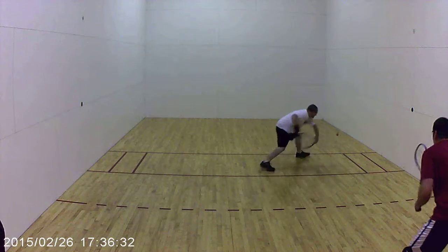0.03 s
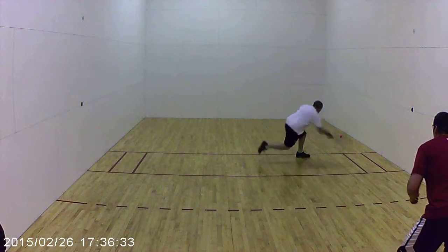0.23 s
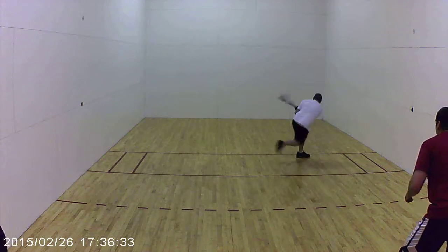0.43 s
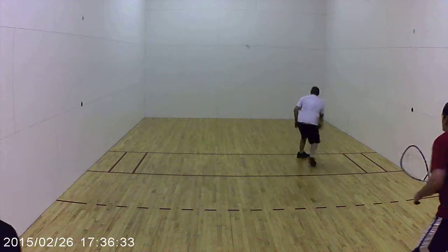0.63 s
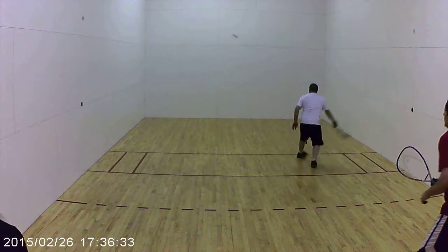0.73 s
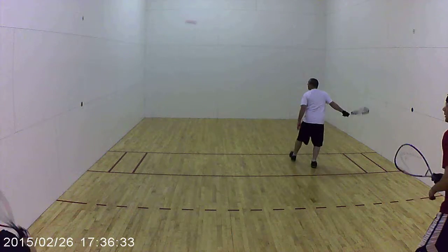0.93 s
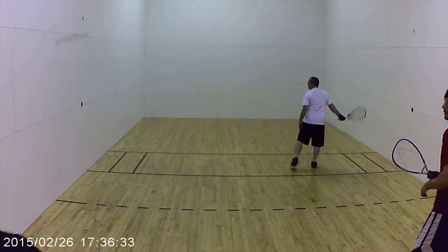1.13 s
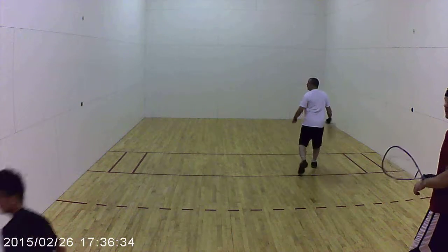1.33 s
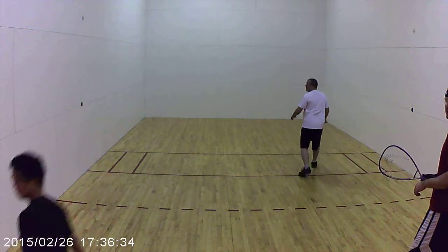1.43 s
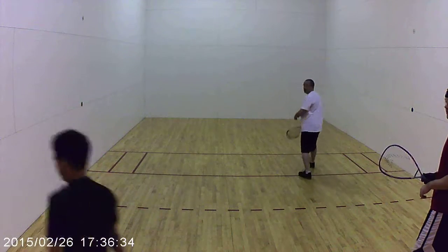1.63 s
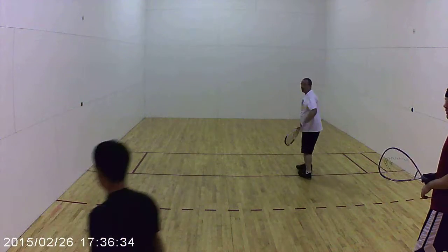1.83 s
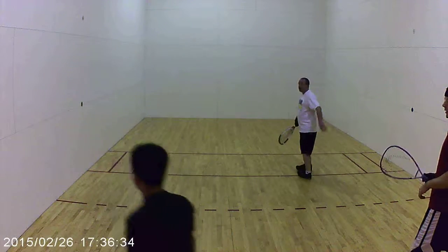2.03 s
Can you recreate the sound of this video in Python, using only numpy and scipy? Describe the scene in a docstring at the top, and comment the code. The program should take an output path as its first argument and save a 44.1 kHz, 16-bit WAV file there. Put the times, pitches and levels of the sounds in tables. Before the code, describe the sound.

Ball struck by racket slams the front wall of an indoor court, echo ringing long afterward.

```python
"""Ball blows in a hard-walled court

A racket strikes a hollow rubber ball, which slams into the front wall and later bounces on the wooden floor;
players' feet thud. Each blow is a short filtered click, heard straight and through seconds of decaying noise
that stands for the dense reflections. A dull frame knock, rumble and hiss are added; a small recorder overloads.
"""
import sys
import numpy as np
from scipy import signal
from scipy.fft import rfft, irfft
from scipy.io import wavfile

SR = 44100
rng = np.random.default_rng(int(sys.argv[2]) if len(sys.argv) > 2 else 0)


def natural_amplitude(level_db):
    """Convert a level in decibels to a linear amplitude factor, elementwise."""
    exponent = np.asarray(level_db, float) / 20
    return 10 ** exponent


def wav_record(signal):
    """Record a signal, one row per channel, as 16-bit PCM in the file named by sys.argv[1]."""
    frames = np.transpose(np.atleast_2d(signal))
    bounded = np.clip(frames, -1, 1)
    # unit amplitude maps onto the largest positive 16-bit level
    quanta = np.round(bounded * 32767).astype(np.int16)
    wavfile.write(sys.argv[1], SR, quanta)


N = 92610  # samples, 2.1 s

# racket blow: (time [s], echo level [dB], direct energy re 10 ms of echo [dB], build-up constant [s])
RACKET_HIT = (.2268, -13, -24, .016)
# relative spectrum of a ball on the front wall: (frequency [Hz], density [dB per Hz])
WALL = [(24, -35), (45, -18), (97, -11), (160, -13), (215, -11), (294, -1), (480, -7), (816, 0), (974, -6),
        (1450, -17), (1660, -12), (1940, -27), (2530, -27), (4000, -41), (8000, -56), (10400, -90)]


def read(points, hz):
    """Interpolation on a logarithmic frequency axis."""
    f, value = np.transpose(points)
    return np.interp(np.log(hz + 1), np.log(f + 1), value)


def add(mix, s, sound):
    """Superposition: adds a sound from time s, cropped to the mix."""
    at = round(s * SR)
    part, sound = mix[max(at, 0):], sound[max(-at, 0):]
    part[:len(sound)] += sound[:len(part)]


def pulse(points, size=8192):
    """Minimum phase: the most compact causal click with this relative spectrum, of energy 1."""
    hz = abs(np.fft.fftfreq(size, 1 / SR))
    log_gain = np.log(natural_amplitude(np.maximum(read(points, hz), -100)))
    # the Hilbert transform of the log gain gives the phase
    spectrum = np.exp(np.conj(signal.hilbert(log_gain)))
    click = np.fft.ifft(spectrum).real[:size // 2]
    return click / np.linalg.norm(click)


def mirrors():
    """Image sources: the straight path and the nearest wall paths, of alternating sign."""
    # straight path, then nearest mirror paths: (delay [s], level [dB])
    near_walls = [(0, 0), (.0065, -1), (.0115, -2)]
    out = np.zeros(1024)
    for k, (s, db) in enumerate(near_walls):
        out[round(s * SR)] = (-1) ** k * natural_amplitude(db)
    return out


def court(rise_s, t60_share, swells=(), size=2 * N):
    """Diffuse reverberation: noise builds up, decays exponentially in each band and may swell by chance."""
    # decay time of the court at a share of 1: (frequency [Hz], T60 [s])
    decay_times = [(40, 1.2), (150, 1.1), (300, 3.5), (500, 5), (800, 5.4), (1200, 4.4), (1700, 3.9),
                   (2500, 3.2), (4000, 2.2), (8000, 1.4)]
    swell_s = .011
    early_db, early_s = 2., .1  # the first reflections stand above the even wash
    taps = rng.standard_normal(size + 512)
    hz, t, bands = signal.stft(taps, SR, nperseg=512)
    t60 = t60_share * read(decay_times, hz)[:, None]
    tail = signal.istft(bands * natural_amplitude(-60 * t / t60), SR, nperseg=512)[1][:size]
    t = np.arange(size) / SR
    build_up = 1 - np.exp(-t / rise_s)
    swell_db = sum(db * np.exp(-((t - s) / swell_s) ** 2) for s, db in swells)
    return tail * build_up * natural_amplitude(swell_db + early_db * np.exp(-t / early_s))


def blow(colour, s, echo_db, direct_db, rise_s, swells=()):
    """Convolution: one click of the ball, heard straight and then from all the walls."""
    path = court(rise_s, 1, swells)
    # at 0 dB the straight click has the energy of 10 ms of unit echo
    path[:1024] += natural_amplitude(direct_db) * np.sqrt(SR / 100) * mirrors()
    out = np.zeros(N)
    add(out, s, natural_amplitude(echo_db) * signal.fftconvolve(pulse(colour), path))
    return out


def air():
    """Stationary filtered noise: building rumble and recorder hiss."""
    # relative spectrum: (frequency [Hz], density [dB per Hz])
    rumble_and_hiss = [(15, -10), (30, -5), (64, -2), (125, 0), (190, -8), (400, -15), (1000, -18),
                       (1500, -24), (2300, -35.5), (4000, -34), (6700, -32), (8000, -35), (9000, -58),
                       (11700, -90)]
    level_db = -36  # RMS
    gain = natural_amplitude(read(rumble_and_hiss, np.fft.rfftfreq(N, 1 / SR)))
    noise = irfft(rfft(rng.standard_normal(N)) * gain, N)
    return natural_amplitude(level_db) * noise / np.sqrt(np.mean(noise ** 2) + 1e-20)


def earlier_wall_blow():
    """Reverberant decay: only the echo of an earlier wall blow still hangs in the air."""
    # (time [s], echo level [dB], direct energy re 10 ms of echo [dB], build-up constant [s])
    earlier_hit = (-1.2, -27, -20, .01)
    return blow(WALL, *earlier_hit)


def floor_thuds():
    """Low-frequency impacts through a sprung floor, which rings shorter than the air."""
    # thuds from feet and from the bounce: (time [s], level [dB])
    steps = [(1.10, -26), (1.288, -21), (1.34, -25), (1.43, -27), (1.53, -26), (1.615, -24), (1.67, -27),
             (1.88, -35)]
    # relative spectrum of a thud: (frequency [Hz], density [dB per Hz])
    shoe = [(30, -10), (60, -7), (100, -1), (170, 0), (260, -9), (600, -24), (2000, -60), (9000, -95)]
    rise_s, t60_share = .008, .3
    out, thud = np.zeros(N), pulse(shoe)
    for s, db in steps:
        ringing = court(rise_s, t60_share, size=N)
        add(out, s, natural_amplitude(db) * signal.fftconvolve(thud, ringing))
    return out


def floor_bounce():
    """Impact on wooden boards: a click whose straight sound is strong beside its echo."""
    # (time [s], echo level [dB], direct energy re 10 ms of echo [dB], build-up constant [s])
    bounce = (1.2855, -25, 6.5, .004)
    # relative spectrum: (frequency [Hz], density [dB per Hz])
    floorboards = [(30, -10), (60, -1), (120, 0), (200, -4), (330, -1), (500, -10), (850, -5), (1500, -20),
                   (3000, -34), (5000, -47), (8000, -56), (10400, -90)]
    return blow(floorboards, *bounce)


def racket_frame():
    """Structure-borne knock: the dull sound of the racket itself, ahead of the echo."""
    # relative spectrum: (frequency [Hz], density [dB per Hz])
    thock = [(40, -22), (130, -6), (260, 0), (450, -3), (800, -17), (1500, -38), (3000, -60), (9000, -95)]
    level_db = 5.
    out = np.zeros(N)
    add(out, RACKET_HIT[0], natural_amplitude(level_db) * signal.fftconvolve(pulse(thock), mirrors()))
    return out


def racket_blow():
    """Impact of a racket on a hollow ball: a click with a slowly building echo."""
    # relative spectrum: (frequency [Hz], density [dB per Hz])
    racket = [(24, -45), (45, -24), (110, -18), (200, -12), (263, -3), (419, -11), (469, -18), (611, -3),
              (996, 0), (1300, -18), (1690, -15), (2160, -40), (3940, -43), (8000, -58), (10400, -90)]
    # chance swells in the level of the noisy echo: (time after the blow [s], level [dB])
    racket_swells = [(.035, 1.5), (.062, 3)]
    return blow(racket, *RACKET_HIT, racket_swells)


def wall_blow():
    """Impact on a rigid wall: the strongest echo, which builds up fast and wavers irregularly."""
    # (time [s], echo level [dB], direct energy re 10 ms of echo [dB], build-up constant [s])
    wall_hit = (.3868, -7, -3, .002)
    # chance swells in the level of the noisy echo: (time after the blow [s], level [dB])
    wall_swells = [(.02, 2.5), (.046, 2.5), (.094, 3.5), (.142, 2.5), (.216, 4.5), (.242, 3), (.304, 3.5),
                   (.43, 3), (.557, 4.5)]
    return blow(WALL, *wall_hit, wall_swells)


def scene():
    """Superposition of all sources in one channel."""
    background = air() + earlier_wall_blow() + floor_thuds()
    ball = floor_bounce() + racket_blow() + wall_blow()
    return (background + racket_frame() + ball)[None]


def band_limit(x):
    """A steep low-pass at the top of the band."""
    return signal.sosfilt(signal.butter(12, 16260, fs=SR, output="sos"), x)


def record(dry):
    """Saturation: the input flattens at its ceiling, then a linear filter dulls the treble."""
    # recorder treble: (frequency [Hz], gain [dB])
    treble = [(6500, 0), (8000, -1.5), (9000, -7), (15000, -5), (15800, -6), (16300, -40)]
    ceiling, knee, offset = .715, 40., -.0086  # a high knee exponent bends sharply
    flat = dry / (1 + abs(dry / ceiling) ** knee) ** (1 / knee) + offset
    gain = natural_amplitude(read(treble, np.fft.rfftfreq(N, 1 / SR)))
    dulled = irfft(rfft(flat) * gain, N)
    return band_limit(dulled)


dry = scene()
out = record(dry)
wav_record(out)
```